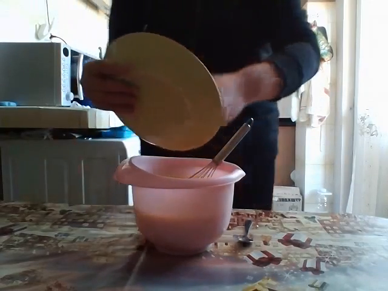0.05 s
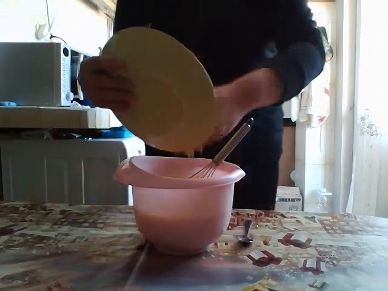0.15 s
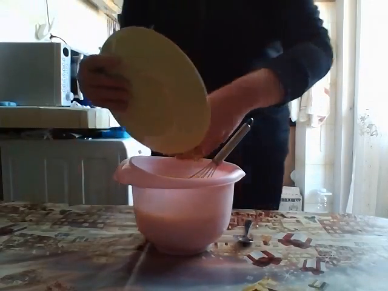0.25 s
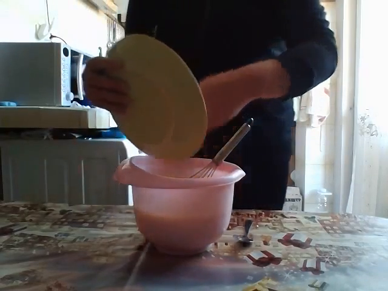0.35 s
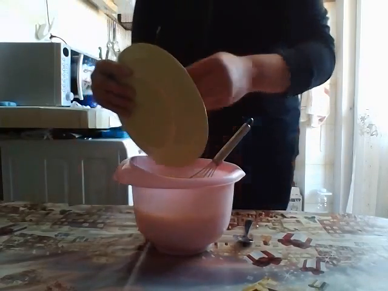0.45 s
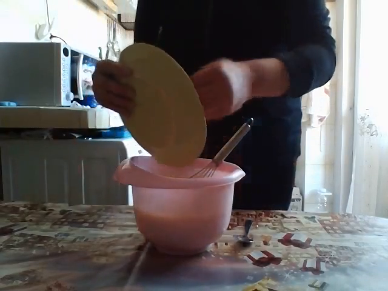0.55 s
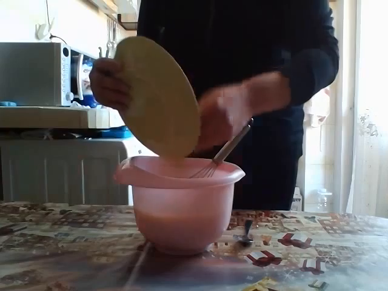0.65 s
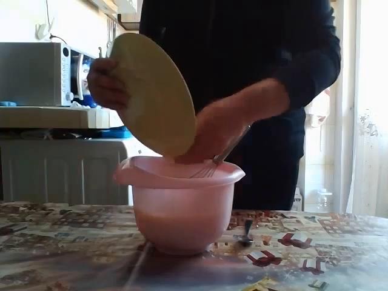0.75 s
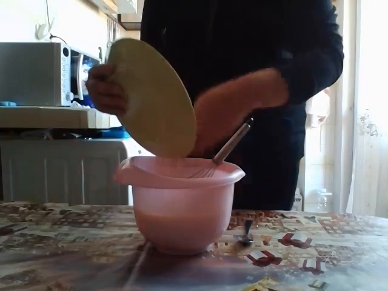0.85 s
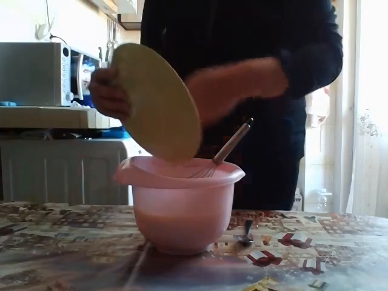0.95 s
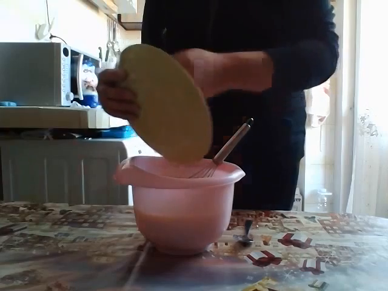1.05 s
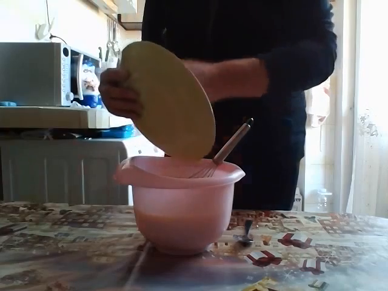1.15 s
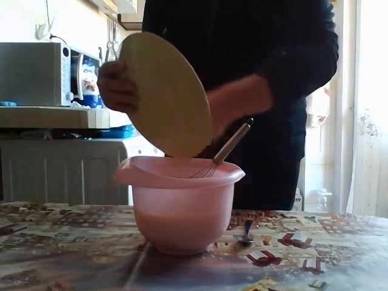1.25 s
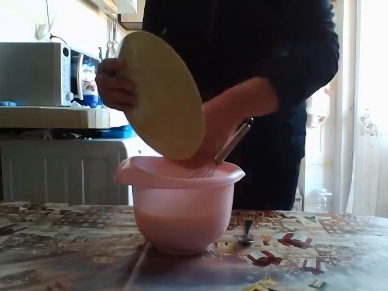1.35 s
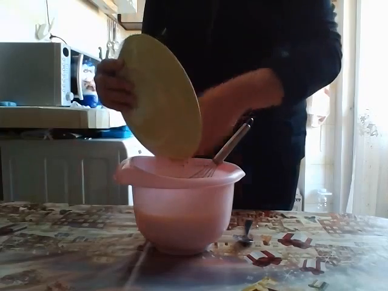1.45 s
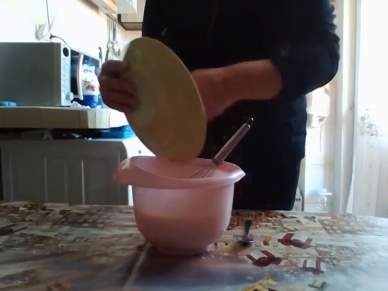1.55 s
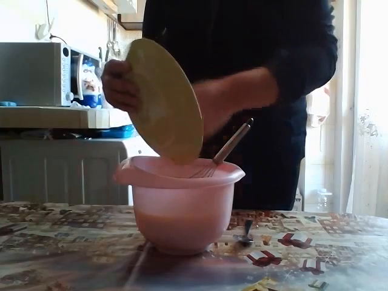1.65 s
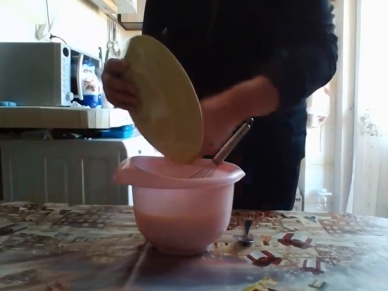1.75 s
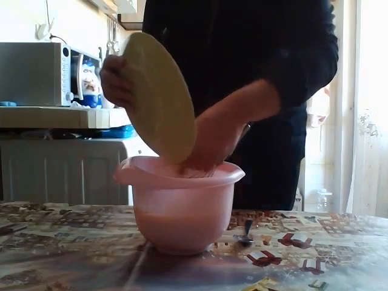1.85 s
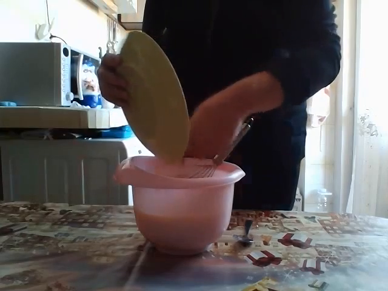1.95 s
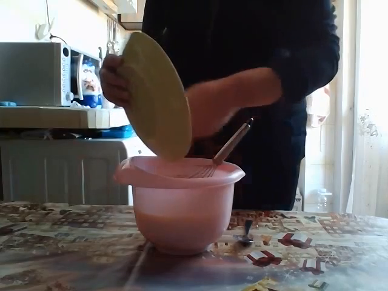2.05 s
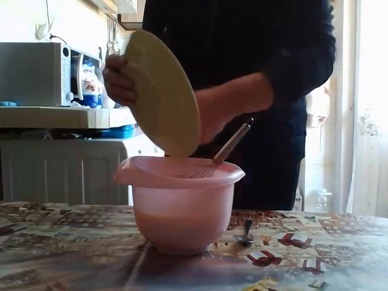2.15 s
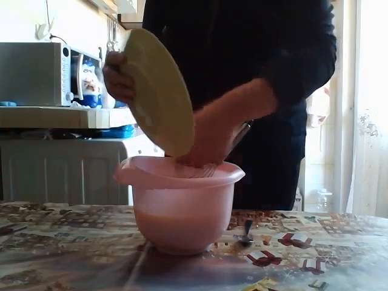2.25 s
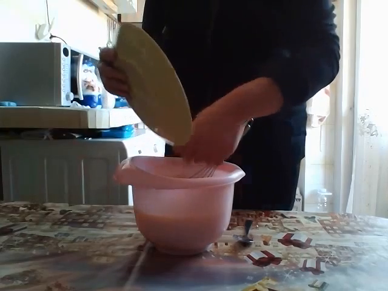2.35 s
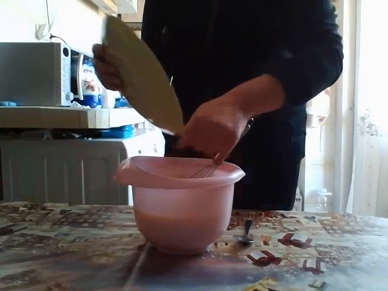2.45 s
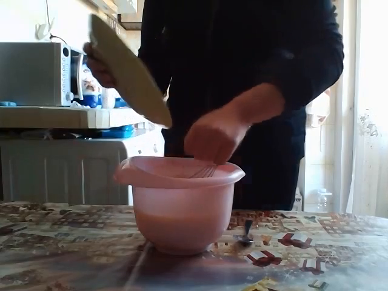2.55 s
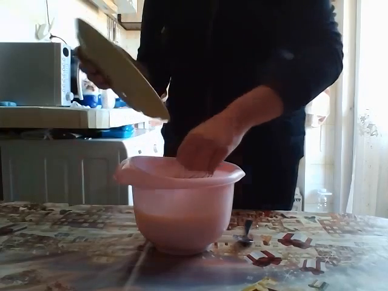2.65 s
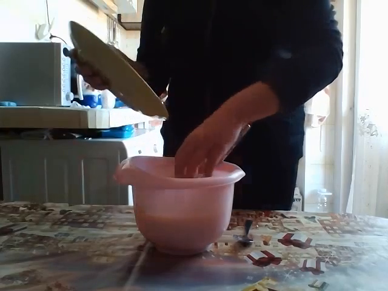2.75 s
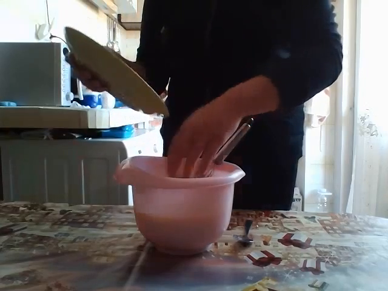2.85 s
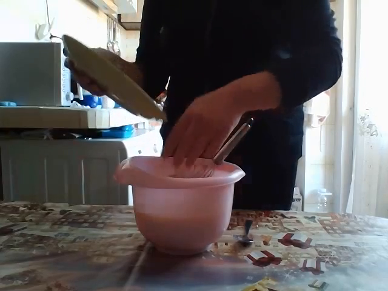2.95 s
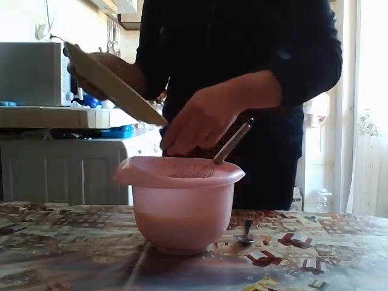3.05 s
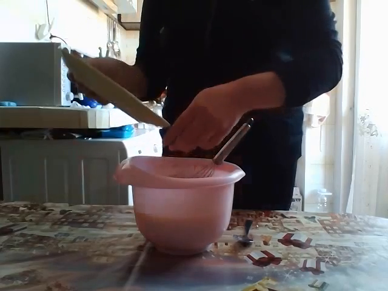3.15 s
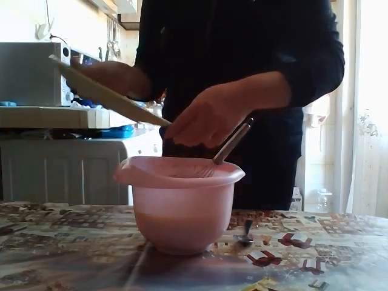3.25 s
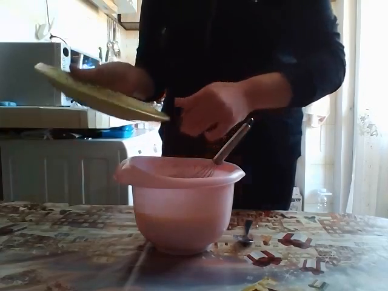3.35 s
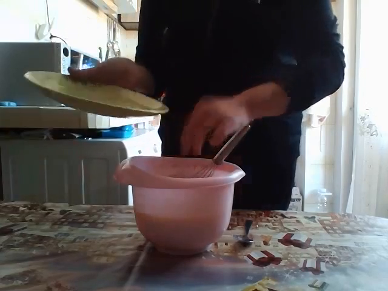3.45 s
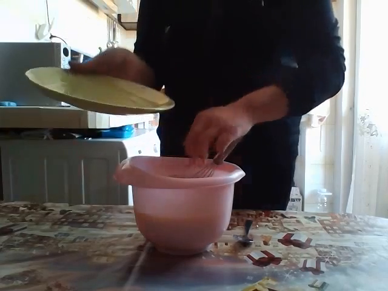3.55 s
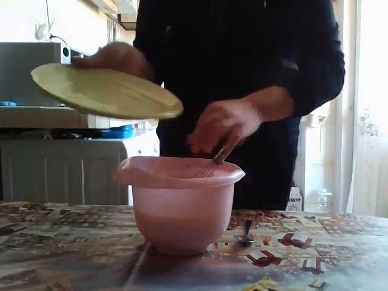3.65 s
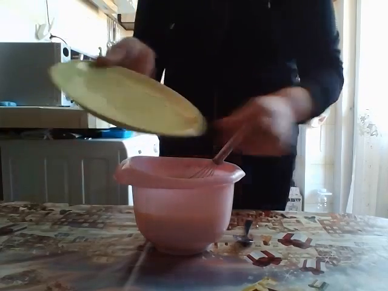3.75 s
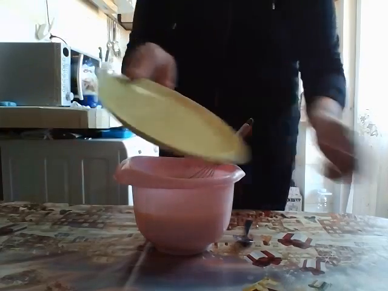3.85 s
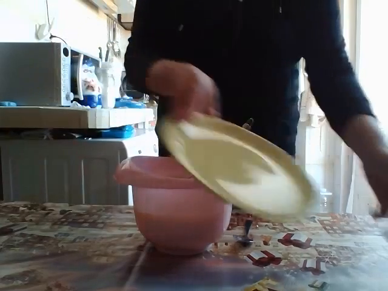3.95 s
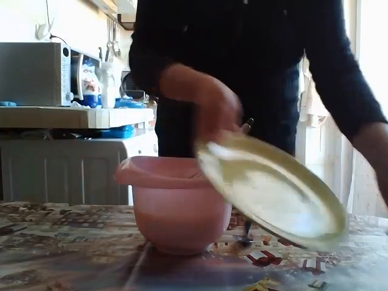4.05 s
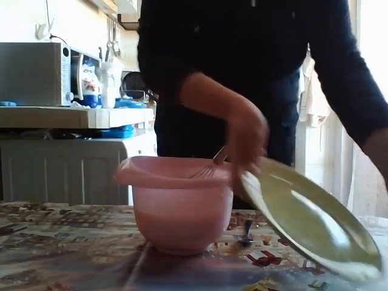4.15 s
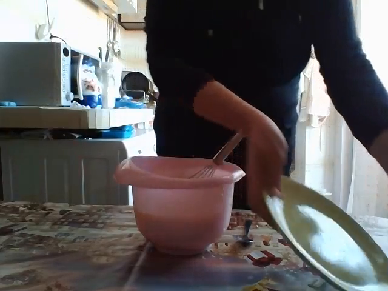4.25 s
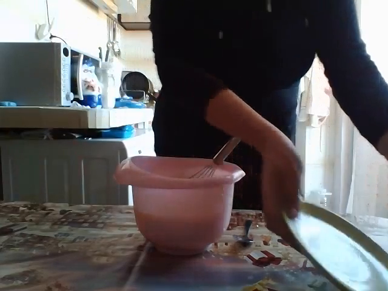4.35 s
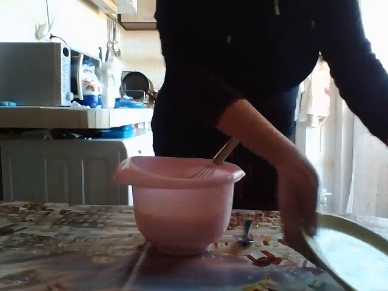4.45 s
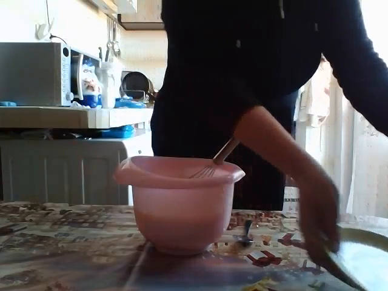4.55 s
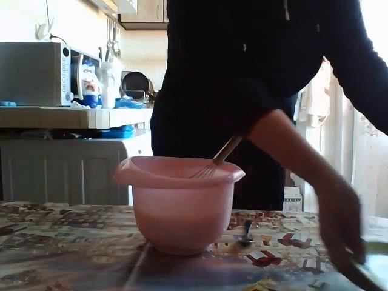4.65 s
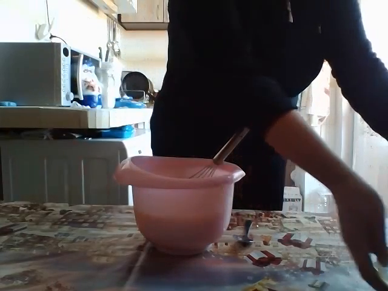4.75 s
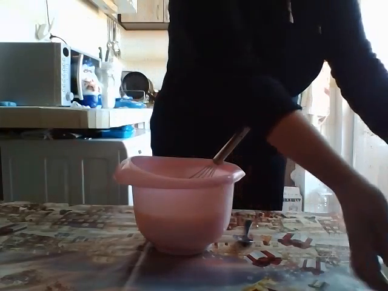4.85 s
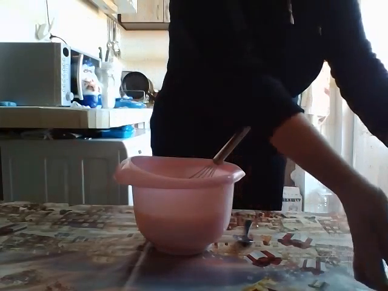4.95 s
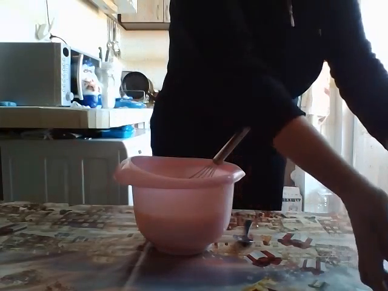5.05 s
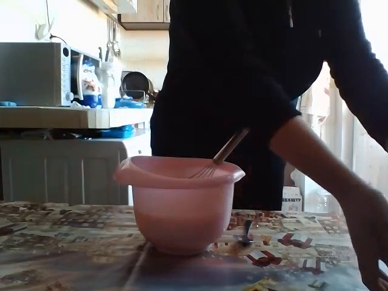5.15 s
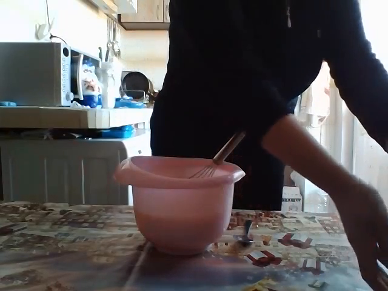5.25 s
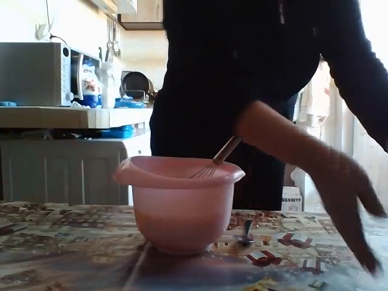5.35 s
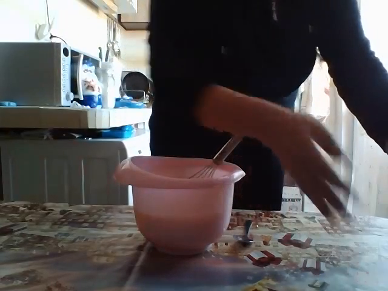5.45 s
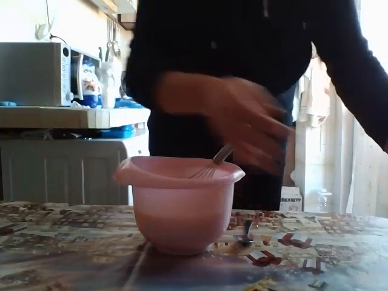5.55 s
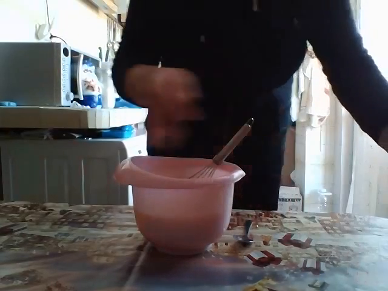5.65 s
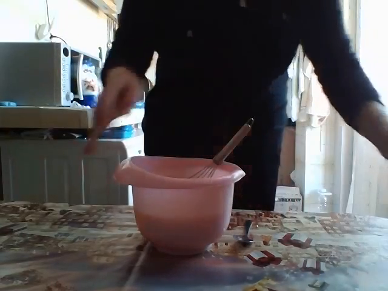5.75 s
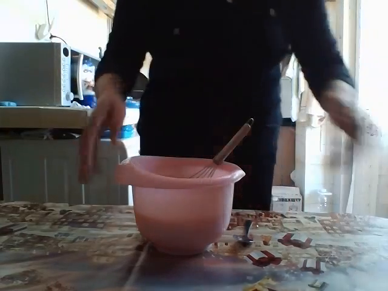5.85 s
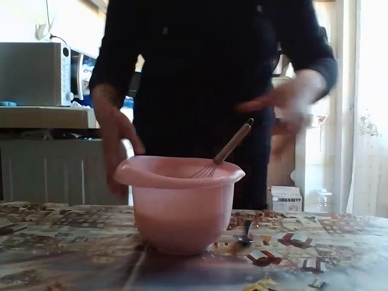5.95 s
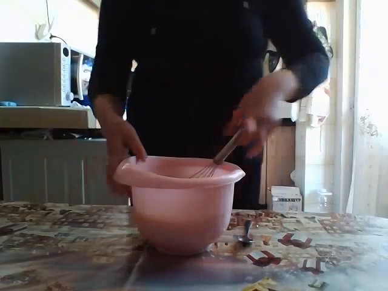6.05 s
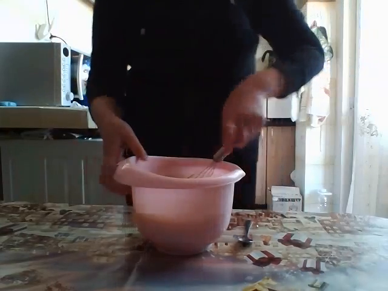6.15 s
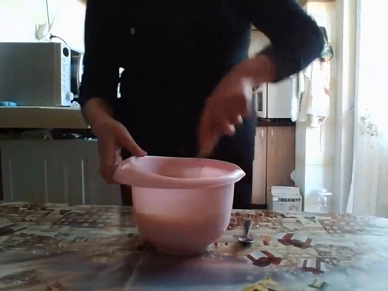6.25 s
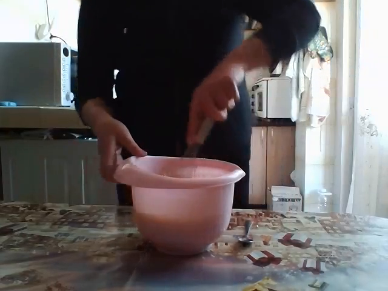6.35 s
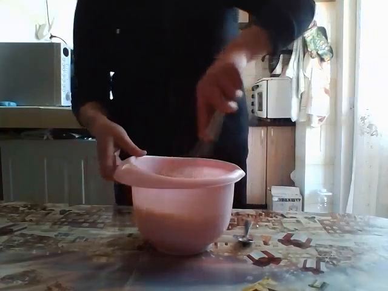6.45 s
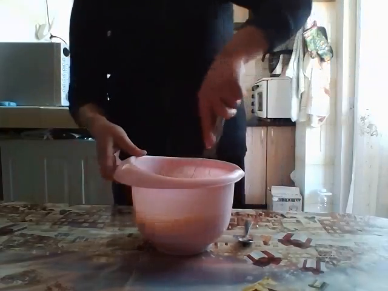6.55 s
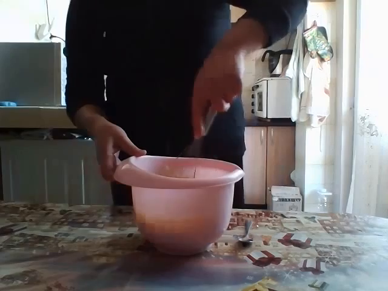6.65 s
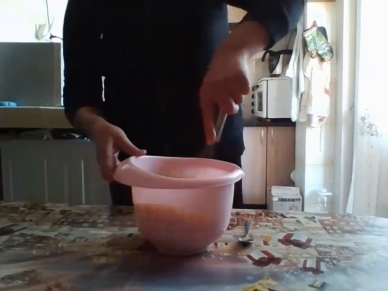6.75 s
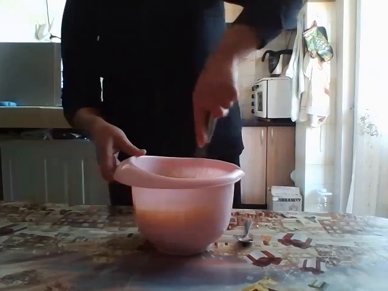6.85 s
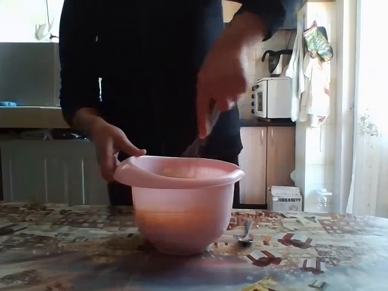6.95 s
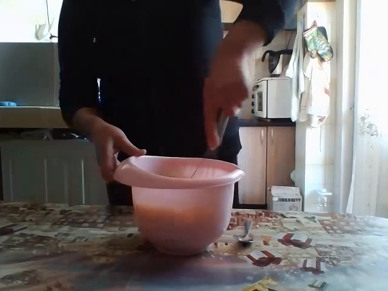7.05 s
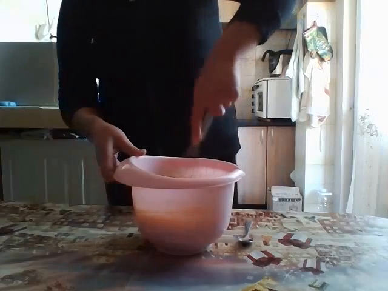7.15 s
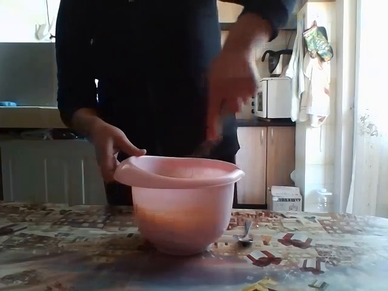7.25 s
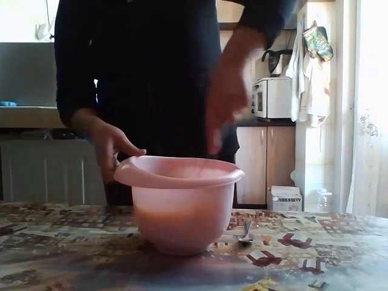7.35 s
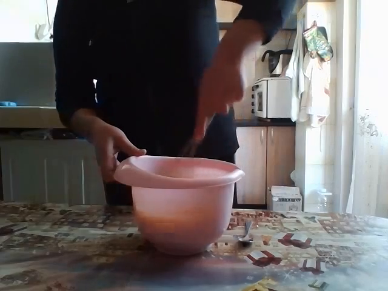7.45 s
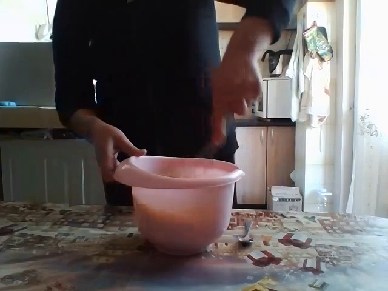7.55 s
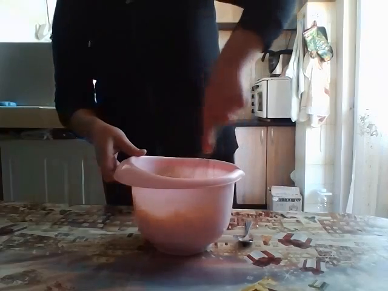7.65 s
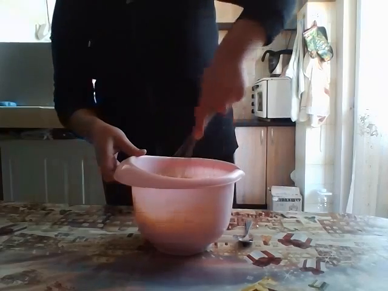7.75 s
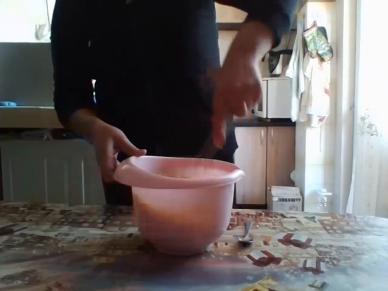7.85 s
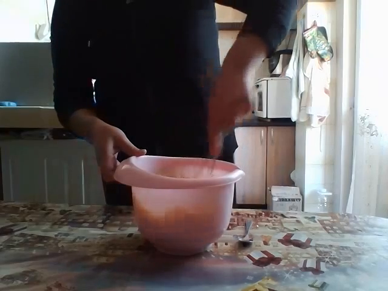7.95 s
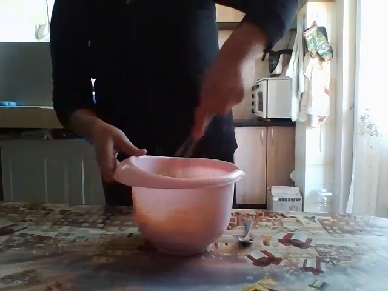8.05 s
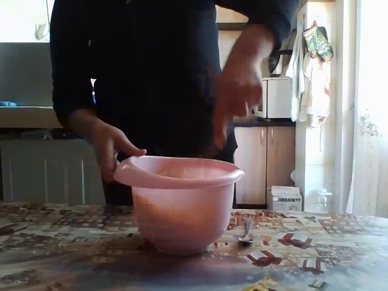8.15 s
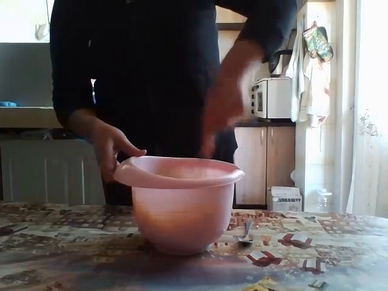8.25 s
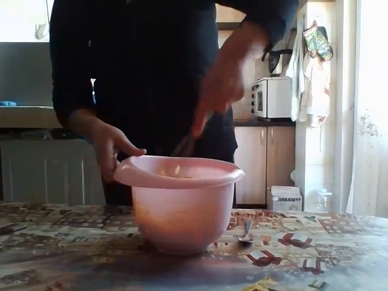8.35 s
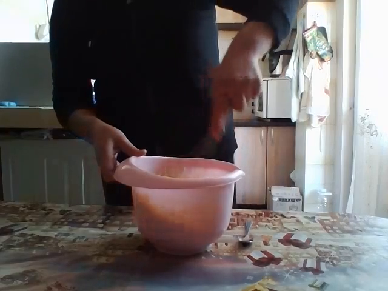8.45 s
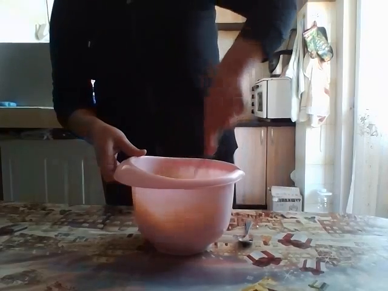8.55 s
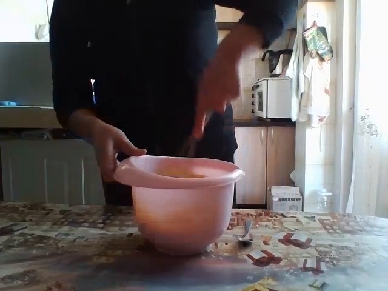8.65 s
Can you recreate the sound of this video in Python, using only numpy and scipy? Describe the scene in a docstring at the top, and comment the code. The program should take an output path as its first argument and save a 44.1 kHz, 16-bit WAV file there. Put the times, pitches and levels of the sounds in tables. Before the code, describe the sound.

In a small kitchen, fingers push soft food off a china plate, making faint ringing taps and quiet wet plops over a low hum. The plate is put on the table with a knock, slides briefly and clatters loudly to rest. Then a wire whisk beats batter in a plastic bowl, about three strokes a second, clacking and sloshing as the bowl rocks. The microphone is close to the table.

```python
"""Plate and whisk in a small kitchen

One microphone close to the table, the cupboards echoing just behind. Fingers push soft food off a
ringing china plate into a plastic bowl of batter. The plate is set down, slides and clatters to rest.
Then a wire whisk beats about three strokes a second with a low boom at each, raking and knocking the
bowl, which rocks on the table. A low drone and hiss lie underneath."""
import sys
import numpy as np
from scipy import signal
from scipy.fft import rfft, irfft, next_fast_len
from scipy.io import wavfile
from scipy.ndimage import uniform_filter1d, minimum_filter1d

SR = 44100
rng = np.random.default_rng(int(sys.argv[2]) if len(sys.argv) > 2 else 0)


def wrap_up_sound(samples):
    """Save the sound to the file named by the first command line argument, as 16-bit audio."""
    columns = np.atleast_2d(samples).T
    # keep every value between -1 and 1, then stretch to whole-number steps
    tamed = np.clip(columns, -1, 1)
    steps = np.round(tamed * 32767).astype(np.int16)
    wavfile.write(sys.argv[1], SR, steps)


N = 384111
EVENT_SAMPLES = SR * 3 // 5
T = np.arange(EVENT_SAMPLES) / SR  # clock of one event
TIME = np.arange(N) / SR  # clock of the scene


def amp(db):
    return 10 ** (np.asarray(db) / 20)

def unit(x):
    return x / np.sqrt(np.mean(x ** 2) + 1e-20)

def fade(t60):
    """Exponential decay, 60 dB down after t60 seconds."""
    return np.exp(-np.log(1000) * T / t60)

def gesture(age, rise, hold, fall_db_per_s):
    """Gain of a push at a given age: it rises, holds and dies away."""
    return np.clip(age / rise, 0, 1) * amp(-fall_db_per_s * np.maximum(age - rise - hold, 0))

def along(points, hz):
    """Read (f/Hz, value) points on a log frequency axis."""
    f, v = np.transpose(points)
    return np.interp(np.log(hz + 1), np.log(f), v)

def add(track, s, x):
    """Mix x into the track at time s."""
    part = track[max(round(s * SR), 0):][:len(x)]
    part += x[:len(part)]

def coloured(x, points):
    """Minimum-phase filter with the spectrum (f/Hz, level/dB)."""
    size = 2 * next_fast_len(len(x) // 2 + SR // 8)
    gain = amp(along(points, np.fft.rfftfreq(size, 1 / SR)))
    cepstrum = irfft(np.log(gain))
    cepstrum[1:size // 2] *= 2
    cepstrum[size // 2 + 1:] = 0
    return irfft(rfft(x, size) * np.exp(rfft(cepstrum)))[:len(x)]

def noise(points):
    """Steady coloured noise of rms 1."""
    return unit(coloured(rng.standard_normal(N), points))

def wander(size):
    """A smooth random curve of rms 1 that changes over about size samples."""
    return unit(uniform_filter1d(uniform_filter1d(rng.standard_normal(N), size), size))

def grains(size, rate):
    """Tiny random impacts, rate a second."""
    return rng.standard_normal(size) * (rng.random(size) < rate / SR)

def ring(modes, shape=((1000, 0),), stretch=1):
    """Damped modes, weighted by a shape (f/Hz, level/dB), at slightly new strengths for every blow."""
    scatter_db = 1.5 * rng.standard_normal(len(modes))
    out = np.zeros(EVENT_SAMPLES)
    for k, (hz, db, t60) in enumerate(modes):
        strength = (-1) ** k * amp(db + scatter_db[k] + along(shape, hz))
        out += strength * np.sin(2 * np.pi * hz * stretch * T) * fade(t60)
    return out

def contact(chatter, t60):
    """One impulse followed by dying chatter."""
    x = rng.standard_normal(EVENT_SAMPLES) * fade(t60)
    x *= chatter / np.linalg.norm(x)
    x[0] = 1
    return x

def struck(x, db):
    """Scale a blow so that its first 20 ms have this rms level."""
    return amp(db) * x / np.sqrt(np.mean(x[:SR // 50] ** 2) + 1e-20)


# modes of the china plate: f/Hz, level/dB, t60/s
PLATE_MODES = [(781, 0, .47), (1012, 1, .16), (1104, -4, .22), (1437, -14, .2), (1647, -8, .2),
               (1760, 2, .26), (1825, -19, .14), (2010, -21, .5), (2225, -18, .2), (2820, -2, .13),
               (2895, -1, .22), (3009, -4, .3), (3790, -13, .14), (4382, -9, .15), (4660, -15, .14),
               (5206, -16, .2), (6417, -20, .16)]
# spectrum of a nail or crumb scraping: f/Hz, level/dB
SCRAPE_SPECTRUM = [(500, -19.5), (950, -0.5), (1700, -3), (2200, -12), (2900, 2), (3400, -4.5),
                   (4600, -9.5), (5400, -18.5), (7000, -18), (13000, -51)]
# taps: t/s, weights of the low/dB, middle/dB, high/dB and top/dB modes, rise/s, damping t60/s
TAPS = [(0.067, -75, -81, -56.5, -76, 0.0075, 1.2), (0.121, -84, -61, -59, -62, 0.0022, 0.44),
        (0.175, -80, -63, -56.5, -69, .001, 0.097), (0.471, -65, -70, -65.5, -76, 0.0022, 0.8),
        (1.251, -73, -73, -65, -76, 0.0041, 0.55), (1.293, -67, -63, -51, -64, .001, 0.16),
        (2.174, -71, -60.5, -56.5, -62, .001, 0.42), (2.347, -51.5, -52.5, -49.5, -45.5, 0.00055, 0.26),
        (3.32, -60, -76, -84, -90, .004, 1.7), (3.989, -40, -51, -58.5, -85, 0.021, 27),
        (4.925, -63, -46.5, -74, -75, 0.016, 1.05), (5.2341, -16.5, -8.5, -31.5, -35, .0004, 0.12)]

def plate_rings():
    """Each touch picks its own modes; they clank, then sing until fingers or cloth damp them."""
    out = np.zeros(N)
    for s, low_db, middle_db, high_db, top_db, rise, damping in TAPS:
        shape = [(800, low_db), (1000, middle_db - 8), (1650, middle_db), (1800, middle_db),
                 (2200, high_db), (3100, high_db), (3700, top_db)]
        press = 1 - np.exp(-(T / rise) ** 2)  # soft touches swell slowly
        scrape = struck(coloured(contact(3.4, t60=0.074), SCRAPE_SPECTRUM), high_db - 11)
        clank = amp(-6) * fade(.1)
        sing = amp(1.5) * press * ring(PLATE_MODES, shape) * (fade(damping) + clank)
        add(out, s, room(sing + scrape, near_db=-11, far_db=-11))
    return out


# low pitches of the thud and the sliding buzz: f/Hz, level/dB, t60/s
THUD_TONES = [(43.6, -15, .37), (74, -9, .2), (96, -8, .22), (154, -9, .2), (194, 1, .23), (245, -5, .19),
              (294, 1, .17), (328, -4, .09), (396, -7, .14), (491, -6, .12)]
# modes of the plate's foot on the cloth: multiple of its pitch, level/dB, t60/s
FOOT_MODES = [(.42, 0, .035), (.9, -7, .05), (1, 0, .06), (1.06, -6, .05), (1.38, -14, .06)]
# spectra of a dull knock and a gritty click: f/Hz, level/dB
KNOCK_SPECTRUM = [(25, -20.5), (60, 4.5), (300, 2.5), (550, 3.5), (800, 2.5), (1050, 2), (1350, -3),
                  (1700, -9), (2050, -9), (2500, -21), (4000, -28), (9000, -69.5), (14000, -99.5)]
CLICK_SPECTRUM = [(900, -24.5), (2000, 10.5), (3000, -2.5), (4500, -12), (6500, -24), (9000, -38),
                  (12000, -47), (15000, -48.5)]
# landings: t/s, relative knock/dB, thud/dB, relative click/dB, upper edge/Hz, foot/dB, foot pitch/Hz
LANDINGS = [(4.3634, -1.5, -16.5, -30.5, 2400, -22.5, 1124), (4.371, -23, -41, -42, 2350, -32, 1136),
            (4.386, -28, -32, -38.5, 2490, -32, 1130), (4.401, -30, -27, -52, 1890, -33.5, 1050),
            (4.429, -22, -32, -67.5, 1700, -34.5, 1325), (4.504, -33.5, -49.5, -67, 1600, -43, 1262),
            (5.137, -18, -19, -72.5, 800, -36, 1000), (5.145, -5.5, -11.5, -52.5, 1165, -16.5, 1017),
            (5.158, -13, -26, -33.5, 1380, -35.5, 1045), (5.2345, -3.5, -14.5, -52, 1650, -20.5, 1030),
            (5.432, -9, -22.5, -60, 1400, -22, 986), (5.4535, -18, -23.5, -46, 1810, -34, 1050)]

def plate_knocks():
    """The foot hits the cloth: a knock, sometimes dull and sometimes bright, a ring, thud and click."""
    out = np.zeros(N)
    thud_rise = 1 - np.exp(-T / .014)  # the thud takes a moment to swell
    foot_rise = 1 - np.exp(-T / .001)
    for s, knock_db, thud_db, click_db, edge_hz, foot_db, foot_hz in LANDINGS:
        cushion = signal.butter(3, edge_hz, fs=SR, output="sos")
        blow = signal.sosfilt(cushion, contact(.4, t60=.013))
        knock = room(coloured(blow, KNOCK_SPECTRUM), near_db=-2, far_db=-6)
        foot = room(foot_rise * ring(FOOT_MODES, stretch=foot_hz), near_db=-7, far_db=-8)
        thud = room(thud_rise * ring(THUD_TONES), near_db=-16, far_db=-16)
        click = room(coloured(contact(2.5, t60=0.017), CLICK_SPECTRUM), near_db=1.5, far_db=-17)
        add(out, s, struck(knock, knock_db - 9) + struck(foot, foot_db))
        add(out, s, struck(thud, thud_db) + struck(click, click_db - 5.5))
    return out


# how strongly sliding excites the plate's modes: f/Hz, level/dB
RASP_WEIGHTS = [(800, -14), (1770, -6), (2900, 9.5), (4400, 11.5), (6400, -1)]

def plate_slide():
    """The sliding plate gives a low, rough buzz near 97 Hz and a faint rasp, both following its speed."""
    start_s, length_s, buzz_hz = 4.526, 0.58, 97.3
    speed = gesture(TIME - start_s, rise=0.035, hold=0.15, fall_db_per_s=84.5)
    speed *= TIME < start_s + length_s
    grip = amp(2.2 * wander(size=500))
    pulse_times = np.cumsum(1 + .1 * rng.standard_normal(int(buzz_hz * N / SR))) / buzz_hz
    pulses = np.bincount((pulse_times * SR).astype(int), minlength=N)[:N]
    buzz_weights = [(45, -2), (100, -1), (150, 5), (200, 0), (245, 5),
                    (294, -2), (330, 2), (400, -8), (500, -14)]
    pulse_ring = ring(THUD_TONES, buzz_weights) * fade(.2)
    buzz = unit(signal.fftconvolve(pulses, pulse_ring)[:N])
    grit = grains(N, rate=2000)
    china = unit(signal.fftconvolve(grit, ring(PLATE_MODES, RASP_WEIGHTS) * fade(.02))[:N])
    rub = unit(coloured(grains(N, rate=900), KNOCK_SPECTRUM))
    rasp = speed ** 0.46 * (amp(-65.5) * china + amp(-45.5) * rub)
    return grip * amp(-30) * speed * buzz + room(grip * rasp, near_db=-2.5, far_db=-8.5)


def clink(s=3.298, hz=2186):
    """A light touch rings a single high partial."""
    out = np.zeros(N)
    envelope = amp(-50.5) * fade(0.062) * (1 - np.exp(-T / 0.0013))
    add(out, s, room(envelope * np.sin(2 * np.pi * hz * T), near_db=5, far_db=-19))
    return out


# the bowl's soft wall, tuned by where the batter lies: multiple of its pitch, level/dB, t60/s
WALL_MODES = [(.64, -7, .02), (1, 0, .03), (1.33, -12, .02)]
# its stiff rim: f/Hz, level/dB, t60/s
RIM_MODES = [(932, -9, .022), (1104, 0, .032), (1200, -6, .016), (1410, -7, .02), (1727, -20, .02)]
# spectra of the click on plastic and the tick of steel wire: f/Hz, level/dB
CLACK_SPECTRUM = [(900, -13.5), (1900, 8.5), (2500, 6), (3200, -2), (4500, -9), (5500, -38), (9000, -37),
                  (15000, -46)]
WIRE_SPECTRUM = [(1500, -17), (3000, -1.5), (3550, 13), (4200, -12), (5200, 1), (6100, 1), (7200, -3),
                 (8200, -16.5), (10000, -24), (15000, -47)]
# whisk on bowl: t/s, rim/dB, wall/dB, wall pitch/Hz, click/dB, wire tick/dB
WHISK_HITS = [(6.036, -60, -66, 427, -54.5, -67), (6.1548, -48.5, -63, 744, -75, -89),
              (6.2052, -64, -55, 790, -45, -70), (6.252, -53, -49.5, 400, -54, -73),
              (6.3168, -27, -29.5, 826, -37.5, -58), (6.45, -51, -62, 780, -56.5, -71),
              (6.542, -41.5, -36.5, 513, -53.5, -74), (6.566, -32, -35, 719, -67, -70),
              (6.8351, -33, -31, 509, -51.5, -69), (6.8666, -33.5, -34, 766, -48.5, -67),
              (7.1021, -46.5, -35, 493, -63, -87), (7.1197, -47, -35, 680, -52, -66),
              (7.142, -42, -40, 540, -58, -67), (7.353, -45, -42.5, 428, -64, -81),
              (7.4109, -39, -36.5, 765, -65.5, -66), (7.5895, -44, -50.5, 860, -53.5, -67.5),
              (7.6623, -39.5, -35.5, 506, -52.5, -66), (7.7446, -43.5, -50, 740, -56.5, -68),
              (7.871, -29.5, -45, 883, -58, -50), (7.8788, -48, -40, 834, -43.5, -60),
              (7.936, -25.5, -27, 717, -50, -64), (7.9606, -39, -37.5, 415, -48.5, -62),
              (8.0113, -47, -20.5, 778, -53, -61), (8.1613, -34.5, -43, 732, -45.5, -69),
              (8.2298, -29.5, -27, 463, -62, -72), (8.2915, -33, -27, 465, -47.5, -59),
              (8.443, -44.5, -55, 730, -56, -61), (8.46, -37.5, -47.5, 700, -43, -51),
              (8.482, -38.5, -56, 730, -47, -71), (8.546, -32, -32.5, 434, -52, -65),
              (8.58, -31, -31.5, 724, -47.5, -65), (8.603, -49, -31.5, 512, -43.5, -62),
              (8.6232, -39.5, -41, 730, -43.5, -54)]

def whisk_clacks():
    """Wires hit the bowl with a click and a tick; the rim rings and the wall gives a wet, sagging note."""
    out = np.zeros(N)
    sagging = T * (1 - .1 * (1 - np.exp(-T / .025)))  # clinging batter lowers the wall's note
    for s, rim_db, wall_db, wall_hz, click_db, wire_db in WHISK_HITS:
        load = 1 + .015 * rng.standard_normal()
        # dull contacts, cushioned by batter, press on more slowly than bright ones
        rise = np.interp(wall_db - click_db, [8, 28], [.003, .006])
        swell = 1 - np.exp(-(T / rise) ** 2)
        note = sum(amp(db) * np.sin(2 * np.pi * ratio * wall_hz * sagging) * fade(t60)
                   for ratio, db, t60 in WALL_MODES)
        rim = room(swell * ring(RIM_MODES, stretch=load), near_db=-6, far_db=-8.5)
        wall = room(swell * note, near_db=-6, far_db=-8.5)
        burst = swell * rng.standard_normal(EVENT_SAMPLES) * fade(0.014)
        click = room(coloured(burst, CLACK_SPECTRUM), near_db=-5, far_db=-5.5)
        tick = room(coloured(contact(6.5, t60=0.013), WIRE_SPECTRUM), near_db=-6.5, far_db=-5.5)
        add(out, s, struck(rim, rim_db) + struck(wall, wall_db) + struck(click, click_db))
        add(out, s + .001, struck(tick, wire_db))
    return out


# spectra of raking wires and sloshing batter: f/Hz, level/dB
RATTLE_SPECTRUM = [(200, -18.5), (350, -3.5), (480, -12), (600, 7), (760, 13), (900, 2.5), (1100, -11.5),
                   (1280, -3.5), (1450, 6), (1750, -12.5), (2300, -16.5), (3200, -91.5), (6000, -51),
                   (12000, -100)]
SLOSH_SPECTRUM = [(70, -32), (135, -13), (195, 10), (280, -7.5), (400, -12), (700, -25), (2000, -74),
                  (6000, -120)]
# strokes: t/s, length/s, rattle and gurgle/dB, slosh/dB, boom/dB, boom delay/s, rocking/dB
BEATING = [(6.328, 0.14, -46.5, -52, -45, 0.0091, -40.5), (6.544, 0.05, -34.5, -28.5, -36.5, 0.0077, -35.5),
           (6.836, 0.064, -33, -31, -27.5, 0.0056, -32), (7.112, 0.054, -31.5, -27.5, -27.5, 0.012, -36),
           (7.359, 0.087, -40, -36, -34, 0.034, -36), (7.648, 0.075, -39.5, -36.5, -41, 0.025, -40.5),
           (7.895, .19, -39, -36.5, -34.5, 0.1, -35), (8.23, .13, -36.5, -44, -39.5, 0.023, -38.5),
           (8.543, 0.16, -38.5, -38.5, -40, 0.026, -38)]

def whisk_strokes():
    """In each stroke the wires rake the wall, the batter sloshes and gurgles, and its foam fizzes."""
    out = np.zeros(N)
    for s, length, rattle_db, slosh_db, *_ in BEATING:
        push = np.sqrt(np.sin(np.pi * np.clip(T / length, 0, 1)).clip(0))
        rattle = push * unit(coloured(grains(EVENT_SAMPLES, rate=450), RATTLE_SPECTRUM))
        wet_rattle = amp(-3) * (rattle + bubbles(length, centre_hz=750, cycles=24))
        slosh = amp(slosh_db) * unit(coloured(grains(EVENT_SAMPLES, rate=1200), SLOSH_SPECTRUM))
        fizz_db = -60.5 + 2 * (s - BEATING[0][0])  # grows as the foam builds
        fizz = amp(fizz_db) * unit(coloured(grains(EVENT_SAMPLES, rate=900), CLICK_SPECTRUM))
        froth = amp(-24.5) * bubbles(1.1 * length, centre_hz=2210, cycles=14)
        stroke = amp(rattle_db) * (wet_rattle + froth) + push * (slosh + fizz)
        add(out, s, room(stroke, near_db=-6.5, far_db=-12))
    return out


def bubbles(length, centre_hz, cycles):
    """Air pockets in the batter: short notes that rise a little, scattered over a stroke."""
    out = np.zeros(EVENT_SAMPLES)
    for when, pitch, softness in rng.random((60, 3))[:int(length * 170)]:
        hz = centre_hz * 2 ** (2.2 * (pitch - .5))
        age = np.minimum(T * hz / cycles, 1)
        chirp = np.sin(2 * np.pi * hz * T * (1 + 0.12 * age))
        add(out, when * length, amp(-12 * softness) * chirp * np.sqrt(age) * fade(cycles / hz))
    return out / np.sqrt(np.sum(out ** 2) / (length * SR) + 1e-20)


# low pitches of the boom at each whisk stroke: f/Hz, level/dB
BOOM_TONES = [(157, -5), (189, -3), (209, 0), (246, -5), (291, -6)]

def stroke_booms(waver_hz=9):
    """Each stroke brings a short, low boom whose pitches waver."""
    shove = gesture(T, rise=0.0092, hold=0.029, fall_db_per_s=268)
    push = np.zeros(N)
    for s, *_, boom_db, delay, _ in BEATING:
        add(push, s + delay, amp(boom_db) * shove)
    tones = sum(amp(db) * np.sin(2 * np.pi * np.cumsum(hz + waver_hz * wander(size=700)) / SR)
                for hz, db in BOOM_TONES)
    return push * unit(tones)


# rumble of the bowl on the table: f/Hz, level/dB
ROCK_SPECTRUM = [(25, -9), (50, -2.5), (85, -6), (125, -11.5), (200, -22.5), (600, -61), (2500, -120)]

def bowl_rocks(drop_back_s=0.19):
    """The bowl rumbles as each stroke tips it, and more softly as it drops back."""
    tip = gesture(T, rise=0.0075, hold=0.061, fall_db_per_s=164)
    sway = np.zeros(N)
    for s, *_, rock_db in BEATING:
        add(sway, s, amp(rock_db) * tip)
        add(sway, s + drop_back_s, amp(rock_db - 25) * tip)
    return sway * noise(ROCK_SPECTRUM)


# flowing batter: f/Hz, level/dB
SWISH_SPECTRUM = [(200, -11.5), (450, -1.5), (800, 5), (1400, -2), (1900, -15.5), (3000, -23.5),
                  (6500, -24), (9000, -34), (15000, -57.5)]

def batter_swish():
    """With each stroke the batter closes behind the wires in a soft wet swish."""
    flow = np.zeros(N)
    for s, *_ in BEATING:
        add(flow, s, gesture(T, rise=0.033, hold=0.016, fall_db_per_s=88))
    return amp(-53) * flow * unit(coloured(grains(N, rate=3000), SWISH_SPECTRUM))


# a wet smack: f/Hz, level/dB
PLOP_SPECTRUM = [(300, -18), (600, -16.5), (1000, -4), (1350, -6), (1800, -10.5), (2150, -20),
                 (2600, -25.5), (5000, -50), (10000, -65)]
# food landing in the batter: t/s, relative level/dB, smear t60/s
FOOD_DROPS = [(0.319, -34, 0.065), (0.325, -54, 0.1), (0.453, -36, 0.046), (0.899, -28, 0.1),
              (0.912, -23.5, 0.14), (0.934, -35.5, 0.21), (2.232, -34, 0.043), (2.249, -37, 0.023),
              (2.509, -34, 0.05), (2.533, -36.5, 0.023), (2.858, -39, 0.03), (2.951, -47, 0.015)]

def food_plops():
    """Each soft bit lands with a dull wet smack; bigger lumps smear it out."""
    out = np.zeros(N)
    give = 1 - np.exp(-T / .0015)  # soft food gives way on contact
    for s, db, smear in FOOD_DROPS:
        squash = rng.standard_normal(EVENT_SAMPLES) * give * (fade(smear) + 2 * fade(0.0045))
        smack = room(coloured(squash, PLOP_SPECTRUM), near_db=-9, far_db=-9)
        add(out, s, struck(smack, db - 16.5))
    return out


# a soft bump: f/Hz, level/dB
BUMP_SPECTRUM = [(30, 2.5), (70, 9), (140, -8), (260, -9), (450, -22), (1500, -39), (5000, -110)]
# hands on the dishes: t/s, level/dB
HAND_BUMPS = [(2.785, -40.5), (3.991, -37.5), (4.211, -50.5), (5.981, -39), (6.079, -40.5), (6.214, -40),
              (6.796, -43.5), (7.005, -47.5), (7.89, -31), (8.172, -41), (8.469, -38), (8.607, -33)]

def handling():
    """Hands shift on plate and bowl with soft low bumps."""
    out = np.zeros(N)
    for s, db in HAND_BUMPS:
        bump = coloured(rng.standard_normal(EVENT_SAMPLES) * fade(0.52), BUMP_SPECTRUM)
        add(out, s, struck(bump, db))
    return out


# the kitchen's reverberation: f/Hz, t60/s
KITCHEN_DECAY = [(80, 0.78), (250, 0.26), (1000, 0.32), (2000, 0.4), (4000, 0.33), (10000, 0.1)]

def room(x, near_db, far_db):
    """At the microphone: direct sound, near echoes off table and cupboards, and the kitchen's tail."""
    hz, t, spectrum = signal.stft(rng.standard_normal(EVENT_SAMPLES), SR, nperseg=256)
    decay = amp(-60 * t / along(KITCHEN_DECAY, hz)[:, None])
    tail = signal.istft(spectrum * decay, SR, nperseg=256)[1][:EVENT_SAMPLES]
    tail *= 1 - np.exp(-T / 0.0054)
    echoes = grains(EVENT_SAMPLES, rate=2500) * fade(0.095) * (T > .003)
    response = (amp(near_db) * unit(echoes) + amp(far_db) * unit(tail)) / np.sqrt(EVENT_SAMPLES)
    response[0] += 1
    return signal.fftconvolve(x, response)[:len(x)]


# spectra of the room's steady noises: f/Hz, level/dB
DRONE_SPECTRUM = [(15, -22.5), (32, -5), (43, -13.5), (49, -7), (56, -6.5), (80, -47), (200, -41.5),
                  (600, -81.5)]
MURMUR_SPECTRUM = [(40, -13.5), (90, 6.5), (150, -5), (190, 6), (225, -3), (260, 3), (340, -0.5),
                   (500, -24.5), (900, -19), (3000, -40.5), (9000, -91)]
HISS_SPECTRUM = [(150, -15.5), (450, 3.5), (580, -5), (800, 2), (1050, 0.5), (1300, -3.5), (1650, -4),
                 (2500, -12.5), (4000, -14.5), (8000, -16.5), (10000, -20.5), (13000, -31.5), (15500, -55)]
# faint steady tones: f/Hz, relative level/dB
WHINE_TONES = [(899.0, -71), (1077, -72.5), (1432, -78.5), (1615, -79.5)]
# swells of the drone: t/s, relative level/dB
DRONE_SWELLS = [(0.0, -58.5), (0.43, -53), (0.8, -54.5), (1.13, -53), (1.86, -66.5), (2.13, -63.5),
                (3.46, -53), (3.9, -52.5)]

def room_tone():
    """A low drone swells and then sinks; a murmur follows it, over a faint whine and even hiss."""
    times, levels = np.transpose(DRONE_SWELLS)
    sunk = np.interp(TIME, [5.0, 5.7], [0, 1])
    swell_db = (1 - sunk) * np.interp(TIME, times, levels) - 64 * sunk
    whine = sum(amp(db) * np.sqrt(2) * np.sin(2 * np.pi * (hz * TIME + rng.random()))
                for hz, db in WHINE_TONES)
    drone = amp(swell_db + 7) * noise(DRONE_SPECTRUM)
    murmur = amp(-59.5 + 0.77 * (swell_db - levels.mean())) * noise(MURMUR_SPECTRUM)
    return drone + murmur + amp(-64) * noise(HISS_SPECTRUM) + amp(-0.5) * whine


def scene():
    """Plate, bowl and room, heard in mono from beside the table."""
    plate = plate_rings() + clink() + plate_knocks() + plate_slide()
    whisk = whisk_clacks() + whisk_strokes() + batter_swish() + stroke_booms() + bowl_rocks()
    return (food_plops() + handling() + plate + whisk + room_tone())[None]


# moments when the sound cuts out: t/s, length/s
LEVEL_DIPS = [(2.675, 0.031), (5.886, 0.009), (6.646, 0.009), (7.757, 0.0074), (8.406, 0.008)]

def record(dry, top_hz=15500):
    """The level dips briefly now and then, a fast limiter holds the loudest knocks, the top is cut off."""
    gate = np.ones(N)
    for s, length in LEVEL_DIPS:
        gate[(TIME > s) & (TIME < s + length)] = amp(-28)
    gated = dry * uniform_filter1d(gate, size=60)
    safe_gain = minimum_filter1d(1 / np.maximum(np.abs(gated), 1), size=241)
    limited = gated * uniform_filter1d(uniform_filter1d(safe_gain, size=121), size=121)
    return irfft(rfft(limited) * (np.fft.rfftfreq(N, 1 / SR) < top_hz), N)


dry = scene()
out = record(dry)
wrap_up_sound(out)
```